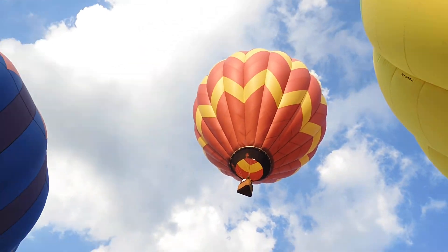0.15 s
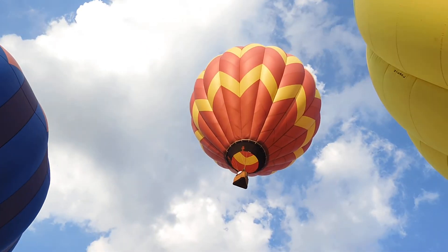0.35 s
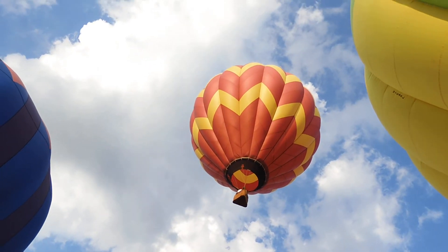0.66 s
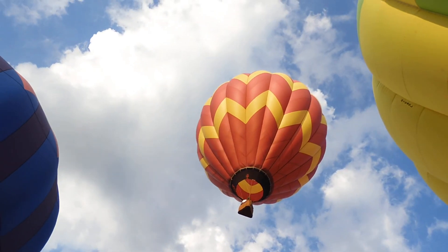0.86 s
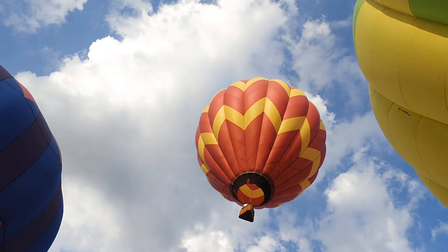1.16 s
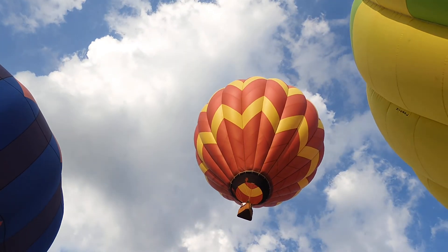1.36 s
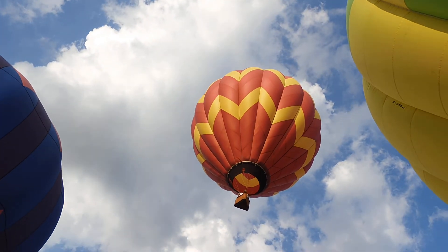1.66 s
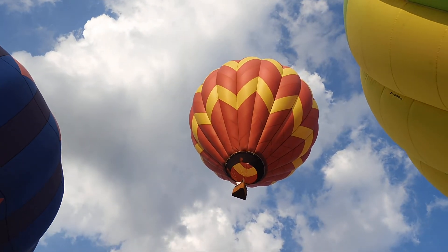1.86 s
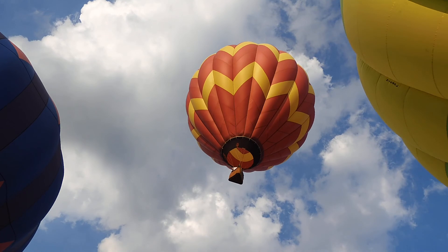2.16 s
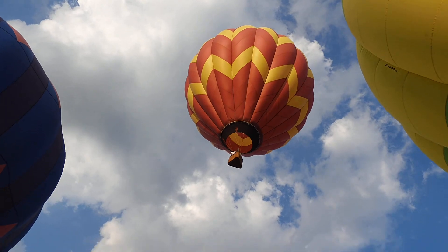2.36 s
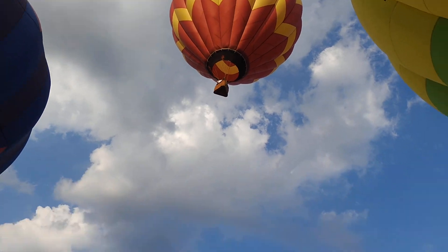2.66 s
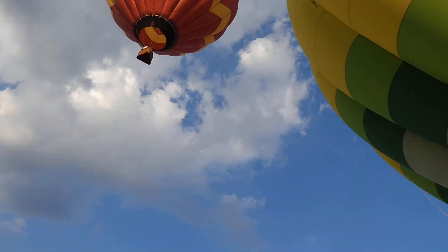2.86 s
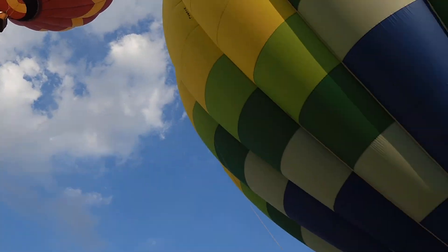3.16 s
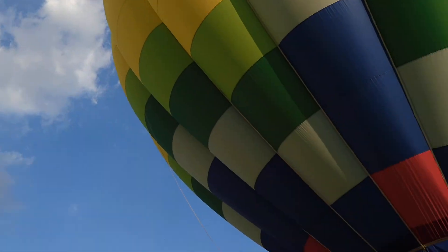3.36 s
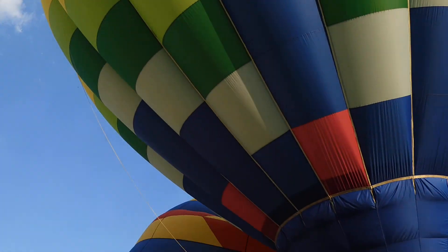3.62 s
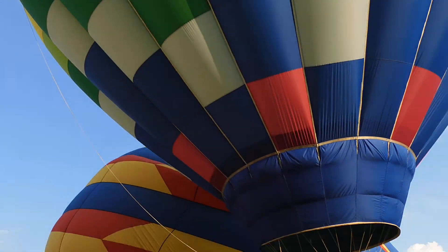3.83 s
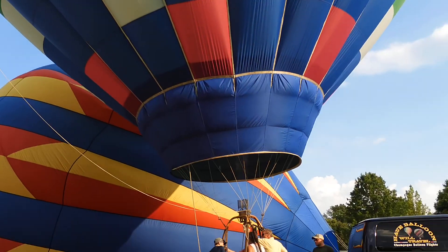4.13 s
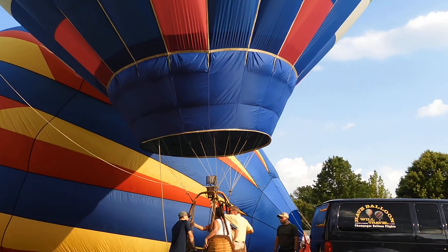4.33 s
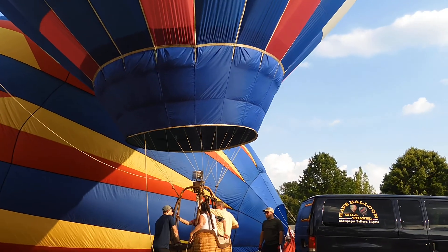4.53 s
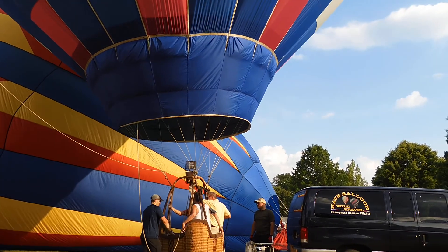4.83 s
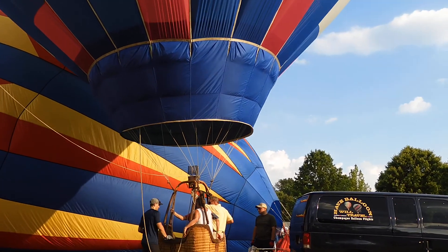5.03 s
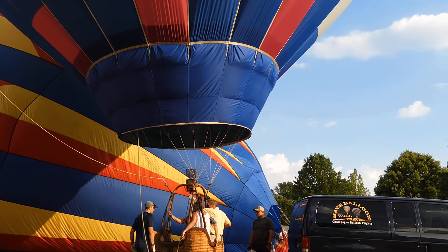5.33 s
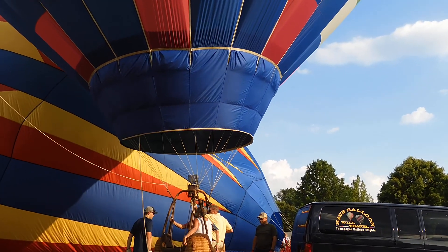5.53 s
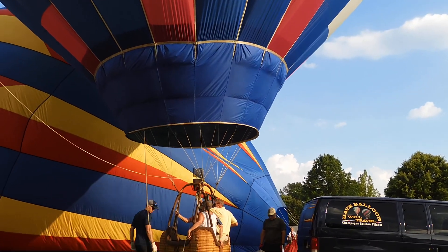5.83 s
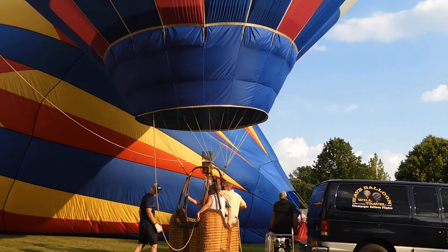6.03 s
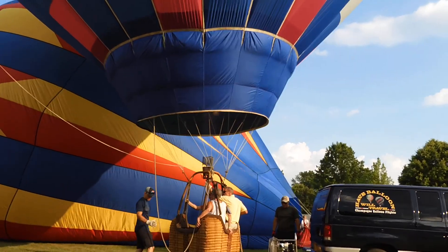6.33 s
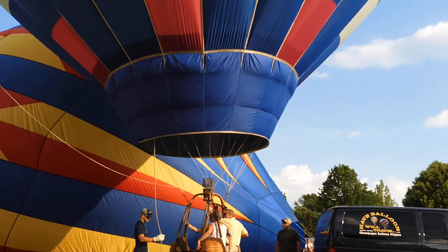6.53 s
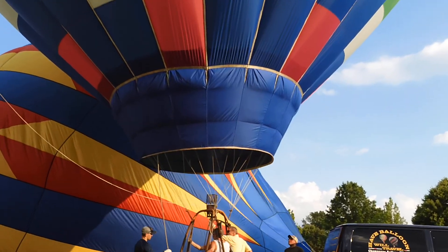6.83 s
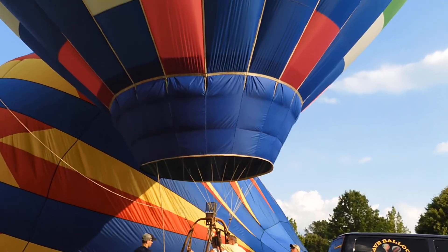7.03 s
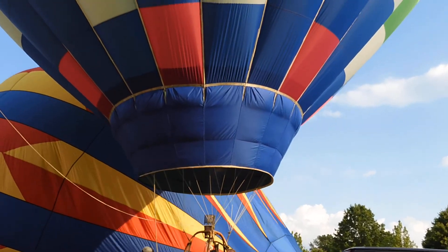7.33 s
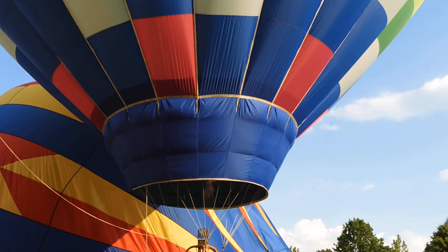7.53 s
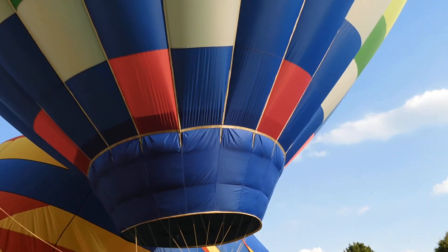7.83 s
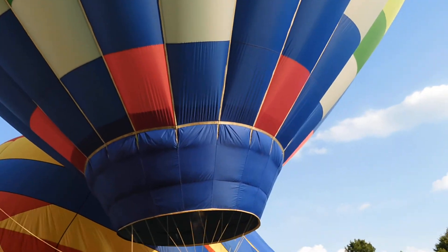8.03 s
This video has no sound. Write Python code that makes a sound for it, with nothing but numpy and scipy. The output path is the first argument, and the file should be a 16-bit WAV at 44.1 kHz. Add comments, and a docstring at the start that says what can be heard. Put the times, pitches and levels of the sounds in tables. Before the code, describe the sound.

Steady buzzing fan wind on an open field for four seconds, then a loud crackling gas-burner blast lasting over three seconds, a short gap, another blast.

```python
"""A petrol-driven two-blade inflation fan drones on an open field: chopped air rush and wavering blade tones.
At four seconds a propane burner under a balloon lights with a thump and fires a long blast, shuts briefly
and fires again; its gas jet is shaped hiss with crackle, its flame a low flaring roar.
The stereo microphone rides on a hand-held camera that tilts from the sky to the basket; its body shades the fan."""
import sys
import numpy as np
from scipy import signal
from scipy.io import wavfile
from scipy.ndimage import uniform_filter1d

SR = 44100
rng = np.random.default_rng(int(sys.argv[2]) if len(sys.argv) > 2 else 0)


def unload_wav(signal):
    """Save mono or channel-first audio to the path in sys.argv[1] as 16-bit WAV at rate SR, clipped to [-1, 1]."""
    wavfile.write(
        sys.argv[1],
        SR,
        np.round(np.clip(np.atleast_2d(signal).T, -1, 1) * 32767).astype(np.int16),
    )


def volts(x):
    """Linear amplitude factor 10**(x/20) for a level x in dB, scalar or array-like."""
    e = np.asarray(x, float) / 20
    return 10 ** e


N = 360738  # length in samples
FRAME, HOP = 1024, 256  # short-time spectra, in samples
HZ = np.fft.rfftfreq(FRAME, 1 / SR)[:, None]
TIME = np.arange(N // HOP + 5) * HOP / SR  # frame times in seconds
CLOCK = np.arange(N) / SR  # sample times in seconds

BLADE_HZ = 111.9  # mean rate of blade passes
FAN_DB, FAN_SHADED_DB = -24.5, -25  # fan level in the open and behind the camera body, before bass and treble shifts
BASS_OPEN_DB, BASS_SHADED_DB = 3, -3
SHADOW_DB = -10.5  # depth of the treble dip at full shade


def evened(x):
    """Scales to rms 1."""
    return x / np.sqrt(np.mean(np.abs(x) ** 2) + 1e-20)


def read(points, hz=HZ):
    """A spectrum joined on a log-frequency axis."""
    f, value = np.transpose(points)
    return np.interp(np.log(hz + 1), np.log(f + 1), value)


def follow(rows, t=TIME):
    """The columns of a curve at times t."""
    s, *columns = np.transpose(rows)
    return [np.interp(t, s, c) for c in columns]


def wander(shape, size):
    """Slow chance along the last axis, rms 1."""
    once = uniform_filter1d(rng.standard_normal(shape), size)
    return evened(uniform_filter1d(once, size))


def hiss(gain, side_db, lean, patchy_db, flicker_db):
    """Turbulent noise as random short-time spectra, patchy and flickering, at two close microphone ports."""
    a, b, c, d, patches = rng.standard_normal((len(TIME), len(HZ), 5)).T
    patches = uniform_filter1d(patches, size=15, axis=1)
    patches = evened(uniform_filter1d(patches, size=8, axis=0))
    flicker = wander(len(TIME), size=3)  # shared by all frequencies
    gain = gain * volts(patchy_db * patches + flicker_db * flicker)
    mid = a + 1j * b
    side = volts(side_db) * (c + 1j * d)
    tilt = volts(read(lean) / 2)
    spectra = gain * np.array([(mid + side) * tilt, (mid - side) / tilt])
    sound = signal.istft(spectra, nperseg=FRAME, noverlap=FRAME - HOP)[1]
    return sound[:, :N] / np.sqrt(FRAME / 3)


# The camera swinging away from the fan. Each row: time in seconds, how far the body shades the fan from 0 to 1,
# centre of the treble shadow in Hz.
CAMERA_TURN = [(0, 0.14, 6000), (.4, 0.28, 6000), (2, 0.1, 6000), (2.5, 0, 6000), (2.85, 0.05, 6000),
               (2.93, 0.5, 5900), (3.1, 0.63, 5750), (3.25, 0.86, 5330), (3.45, .75, 4870),
               (3.65, 0.8, 4600), (3.95, .7, 4600), (4.3, 1, 4500), (7.4, 1, 4540), (7.9, 0.83, 4600)]


def shadow(hz, t):
    """dB change as the camera body blocks a band of the fan's treble."""
    shade, centre_hz = follow(CAMERA_TURN, t)
    octaves = np.log2((hz + 1) / centre_hz)
    return SHADOW_DB * shade * np.exp(-(octaves / 0.56) ** 2)


def outlook(hz, t):
    """dB level of the fan as the camera body shadows its treble and the ground path shifts its bass."""
    shade = follow(CAMERA_TURN, t)[0]
    level_db = FAN_DB + (FAN_SHADED_DB - FAN_DB) * shade
    bass_db = BASS_OPEN_DB + (BASS_SHADED_DB - BASS_OPEN_DB) * shade
    return level_db + shadow(hz, t) + bass_db / (1 + (hz / 700) ** 4)


# Spectrum of the fan's rush of air. Each row: frequency in Hz, relative density in dB per Hz.
FAN_AIR = [(18, -50), (30, -54), (108, -13.5), (561, -20), (709, -17.5), (1020, -11.5), (1110, -7),
           (1440, -2.5), (2240, -2), (4420, -1), (5170, -3), (8280, -22.5), (9680, -34.5), (13300, -45),
           (15500, -62)]
# How much of the rush the blades cut up. Each row: frequency in Hz, share of the power from 0 to 1.
CHOPPED_SHARE = [(60, 0.05), (700, 0.13), (1500, 0.29), (2800, 0.14), (4500, 0.66), (8000, 0.25),
                 (15000, .2)]
# Stereo width of the fan in the open. Each row: frequency in Hz, side against mid in dB.
FAN_WIDTH = [(60, -18), (110, -24), (200, -19), (380, -27), (700, -17), (1290, -31), (2380, -18),
             (4400, -17), (8120, -4.5), (15000, 3)]
# Stereo lean of the fan. Each row: frequency in Hz, left over right in dB.
FAN_BALANCE = [(60, 0), (130, 0.5), (290, 2.3), (640, 2), (1410, 0.5), (3100, 0.0), (6820, 2.5), (15000, 9)]


def fan_rush(passes):
    """Turbulent air, partly steady and partly thrown off in a burst at each blade pass."""
    air = evened(volts(read(FAN_AIR))) * volts(outlook(HZ, TIME))
    side_db = read(FAN_WIDTH) - 1.25 * shadow(HZ, TIME)  # scattered sound from the sides escapes the shadow
    share = np.clip(read(CHOPPED_SHARE), 0, 1)
    # the engine fires once in four passes and pushes that one harder
    burst = np.exp(0.86 * np.cos(2 * np.pi * passes) + 0.17 * np.cos(2 * np.pi * passes / 4))
    steady = hiss(air * np.sqrt(1 - share), side_db, FAN_BALANCE, patchy_db=1.3, flicker_db=0.46)
    chopped = hiss(air * np.sqrt(share), side_db, FAN_BALANCE, patchy_db=-0.6, flicker_db=-1.24)
    return steady + evened(burst) * chopped


# Blade and shaft tones of the fan. Each row: multiple of the blade rate, base level in dB rms before lift and drift.
BLADE_TONES = [(.5, -63.5), (.75, -64), (1, -54.5), (1.25, -75), (1.5, -62.5), (2, -57), (3, -56.5),
               (4, -78), (5, -57), (6, -63), (7, -64), (8, -52.5), (9, -52.5), (10, -44), (11, -44.5),
               (12, -43), (13, -40), (14, -43.5), (15, -43), (16, -44.5), (17, -42.5), (18, -47),
               (20, -42.5)]
# Single tones that swell for a while. Each row: centre in seconds, half length in seconds,
# multiple of the blade rate, lift in dB.
TONE_SWELLS = [(0.21, 0.41, 9, 11), (0.247, 0.37, 13, -2), (.4, 0.35, 8, 5.5), (.4, 0.23, 16, 7),
               (.6, .2, 14, 7.5), (1.3, 0.61, 16, 7.5), (1.353, 0.22, 10, 7), (2.01, 0.12, 13, 5),
               (2.2, 0.2, 6, 8), (2.55, 0.55, 12, 10), (2.813, 0.13, 14, 10), (2.9, .2, 18, 6),
               (3.313, 0.28, 10, 4), (3.45, 0.23, 11, 5), (3.798, 0.18, 11, 11), (2.45, 0.2, 2, 5.5),
               (.95, 0.23, 2, 2.5), (1.95, .2, 7, 5), (2.75, .15, 7, 5), (7.7, .15, 13, 5)]


def fan_tones(passes):
    """Harmonics of the turning blades, whose level and phase waver as paths mix."""
    out = np.zeros((2, N))
    for k, db in BLADE_TONES:
        lift = outlook(k * BLADE_HZ, TIME) - FAN_DB - 1.0
        for centre_s, half_s, multiple, up_db in TONE_SWELLS:
            if round(multiple) == k:
                lift = lift + up_db * np.exp(-((TIME - centre_s) / half_s) ** 2)
        drift = np.interp(CLOCK, TIME, wander(len(TIME), size=14))
        waver = 0.7 * np.interp(CLOCK, TIME, wander(len(TIME), size=15))  # radians
        apart = 0.084 * drift * np.array([[1], [-1]])  # radians, opposite left and right
        tone = np.cos(2 * np.pi * (k * passes + rng.random()) + waver + apart)
        tone_db = db + np.interp(CLOCK, TIME, lift) + 2.6 * drift
        out += np.sqrt(2) * volts(tone_db) * tone
    return out


def fan():
    """Air rush and blade tones driven by one slightly unsteady rotation, counted in blade passes."""
    passes = np.cumsum(BLADE_HZ * (1 + .001 * wander(N, size=8000))) / SR
    return fan_rush(passes) + fan_tones(passes)


# Pulls of the burner valve. Each row: opening in seconds, rise time of the jet in seconds,
# start of shutting in seconds, base jet level in dB.
VALVE_PULLS = [(3.986, 0.081, 7.5, -11), (7.907, 0.054, 9, -11.5)]
JET_FALL_S = 0.22  # the line empties
ROAR_HOLD_S, ROAR_FALL_S = 0.11, 0.051  # the flame holds on after shutting, then dies away
FLAME_LAG = 1.5  # the flame's rise time against the jet's
FLARE_S = 0.33  # pooled gas flares just after lighting
# tilt of the top of the hiss, dB per octave: at opening, change per second of blast, extra in the flare
TOP_DB, TOP_SAG_DB_PER_S, FLARE_TOP_DB = 1.5, -1, 1


def valve():
    """Jet and flame strength, the flare, the tilt of the hiss top and the emptying of the line."""
    jet, flame, flare, top_db, spent = np.zeros((5, len(TIME)))
    for open_s, rise_s, shut_s, db in VALVE_PULLS:
        age = np.maximum(TIME - open_s, 0)
        left = np.clip(1 - (TIME - shut_s) / JET_FALL_S, 0, 1)
        jet = jet + volts(db) * (1 - np.exp(-age / rise_s)) ** 2 * left
        growth = (1 - np.exp(-age / (FLAME_LAG * rise_s))) ** 2
        dying = np.exp(-np.maximum(TIME - shut_s - ROAR_HOLD_S, 0) / ROAR_FALL_S)
        flame = flame + volts(db) * growth * dying
        # the newest pull sets these
        flare = np.where(age > 0, np.exp(-(age / FLARE_S) ** 2), flare)
        top_db = np.where(age > 0, TOP_DB + TOP_SAG_DB_PER_S * age, top_db)
        spent = np.where(age > 0, 1 - left, spent)
    return jet, flame, flare, top_db + FLARE_TOP_DB * flare, spent


# Spectrum of the gas jet. Each row: frequency in Hz, relative density in dB per Hz.
JET_HISS = [(530, -51), (900, -21.5), (1130, -27), (1420, -7), (1590, -12.5), (1880, -7), (2540, -5.5),
            (2820, -3), (3070, -4.5), (5120, -4.5), (9070, -19.5), (12500, -33), (15500, -40.5)]


def gas_jet(flow, top_db, spent):
    """Spectra of gas rushing from the nozzle; the slowing jet loses its treble first."""
    band = (HZ > 2500) & (HZ < 7000)  # the band that sets its strength
    shape = volts(read(JET_HISS))
    shape = shape / np.sqrt(np.mean(shape ** 2 * band))
    top_octaves = np.clip(np.log2(HZ / 5500 + 1e-9), 0, 1.2)
    shut_octaves = np.log2(np.maximum(HZ / 3000, 1))
    return shape * flow * volts(top_db * top_octaves) * volts(-8 * spent ** 1.9 * shut_octaves)


# Spectrum of the flame's roar before its pitch factor. Each row: frequency in Hz, relative density in dB per Hz.
FLAME_ROAR = [(200, -37), (270, -12), (340, -10.5), (470, -3.5), (600, -6.5), (800, -10), (1200, -6),
              (2200, -78)]
# Spectrum of the rumble under the roar. Each row: frequency in Hz, relative density in dB per Hz.
FLAME_RUMBLE = [(20, -30), (50, -5), (100, 0), (155, 4.5), (190, 3.5), (230, -53), (400, -70)]


def flame_roar(flame, flare, vigour_db, pitch):
    """Spectra of the fluttering flame: a roar that flares after lighting, over a deeper rumble."""
    roar = evened(volts(read(FLAME_ROAR, HZ / pitch))) * volts(-15 + vigour_db + 6 * flare)
    rumble = evened(volts(read(FLAME_RUMBLE))) * volts(-30.5 + 0.99 * vigour_db)
    flutter = volts(0.42 * wander(len(TIME), size=4))
    return np.hypot(roar, rumble) * flame * flutter


def jet_crackle():
    """Shock ripples in the jet: sparse sharp spikes, each a very short 4 kHz ring, rms 1."""
    spikes = volts(3.0 * np.minimum(rng.exponential(1, N), 4)) * (rng.random(N) < 300 / SR)  # 300 a second
    u = np.arange(64) / SR
    ring = np.sin(2 * np.pi * 4000 * u) * u * np.exp(-u / .0001)
    return evened(signal.oaconvolve(spikes, ring)[:N])


# The wavering burn. Each row: time in seconds, change of gas flow in dB, vigour of the flame in dB.
BURN_WAVER = [(4.2, 2, 6), (4.4, -0.5, 3), (4.6, 1, 4), (5.1, -0.5, 1.5), (5.5, -.3, 0.5), (5.85, -2.5, -2),
              (6.1, -1.5, 0), (6.35, -2.5, -2.5), (6.6, -2, -0.5), (6.9, -.5, 2.5), (7.15, -.5, 1),
              (7.33, -3, 1), (7.45, -3.5, 0.5), (7.56, -4, 1.5), (8.1, 0, 5)]
# Camera height against the flame. Each row: time in seconds, first notch of the ground echo in Hz,
# echo strength from 0 to 1 before its treble loss, factor on the roar's pitch.
GROUND_ECHO = [(4, 1260, 0.06, 1.06), (5.2, 990, 0.08, 0.99), (6.1, 866, 0.2, 1.025), (7, 910, 0.25, 1.21),
               (7.5, 1070, 0.25, 1.17), (8.2, 955, 0.06, 1.2)]
# Stereo width of the burner. Each row: frequency in Hz, side against mid in dB.
BURNER_WIDTH = [(60, -11), (110, -26), (200, -16), (380, -21), (700, -17.5), (1290, -22), (2380, -22),
                (4400, -20.5), (6500, -11.5), (8120, -7.5), (15000, -1.5)]
# Stereo lean of the burner. Each row: frequency in Hz, left over right in dB.
BURNER_BALANCE = [(60, 0), (130, 0.5), (290, 1.5), (640, 1.0), (1410, 0.5), (3100, 0.5), (5200, -.5),
                  (6500, -2), (7500, -5.5), (8500, 6), (9500, 3.5), (10800, 9.5), (12200, 0), (14000, -5)]


def burner():
    """Jet hiss with crackle and a low flame roar, the hiss and roar combed by the echo off the grass."""
    flow, flame, flare, top_db, spent = valve()
    flow_db, vigour_db = follow(BURN_WAVER)
    flow = flow * volts(flow_db)
    notch_hz, strength, pitch = follow(GROUND_ECHO)
    comb = abs(1 - strength * np.exp(-HZ / 4000) * np.exp(2j * np.pi * HZ / notch_hz))
    # a later bounce off the taut fabric ripples the hiss more finely
    bounce = 0.068 * np.exp(-np.log2((HZ + 1) / 3500) ** 2)
    comb *= abs(1 - bounce * np.exp(2j * np.pi * HZ / 436))
    jet = gas_jet(flow, top_db, spent)
    roar = flame_roar(flame, flare, vigour_db, pitch)
    blast = hiss(comb * np.hypot(jet, roar), read(BURNER_WIDTH), BURNER_BALANCE, patchy_db=1.14, flicker_db=0.75)
    return blast + jet_crackle() * np.interp(CLOCK, TIME, flow * volts(-21.5))


def ignition():
    """The gas cloud lights with one soft thump: a push of air that swings back and dies away."""
    out = np.zeros(N)
    u = np.arange(SR // 8) / (SR * 0.0024)  # time in units of 2.4 ms
    out[round(4.0 * SR):][:len(u)] = volts(-22.5) * u * (2 - u) * np.exp(-u)  # at 4 s
    return out


def scene():
    """Fan, burner and ignition add up in the air."""
    return fan() + burner() + ignition()


def low_pass(x):
    """Removes everything above the highest recorded frequency."""
    return signal.sosfilt(signal.butter(12, 15660, fs=SR, output="sos"), x)


def record(dry):
    """The microphone cuts the bass below 45 Hz and a gain control leans on whatever is loud."""
    cut = signal.sosfilt(signal.butter(2, 45, "high", fs=SR, output="sos"), dry)
    power = uniform_filter1d((cut ** 2).mean(0), size=3000)
    power_db = 10 * np.log10(abs(power) + 1e-12)
    fall = np.arange(N) * 96.0 / SR  # recovery at 96 dB a second
    peak_db = np.maximum.accumulate(power_db + fall) - fall
    over_db = np.maximum(peak_db + 26.0, 0)  # above a threshold of -26 dB
    held = cut / volts(.4 * uniform_filter1d(over_db, size=1000))
    return low_pass(held)


dry = scene()
out = record(dry)
unload_wav(out)
```